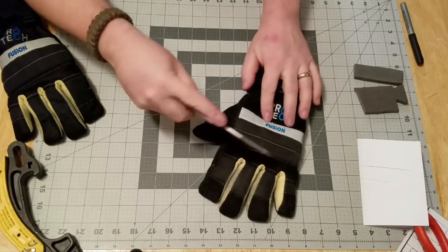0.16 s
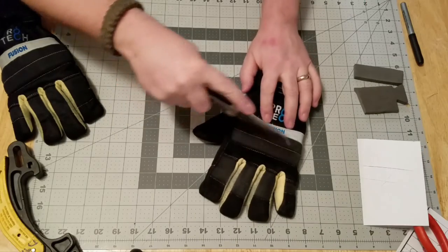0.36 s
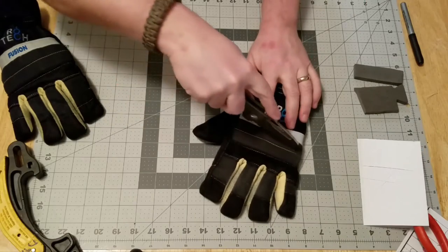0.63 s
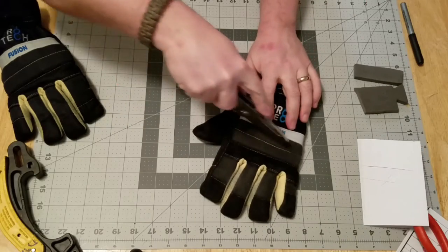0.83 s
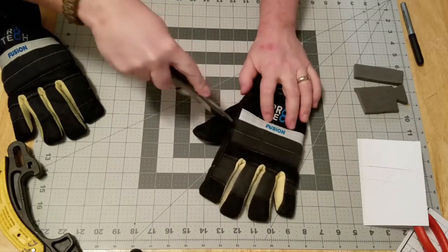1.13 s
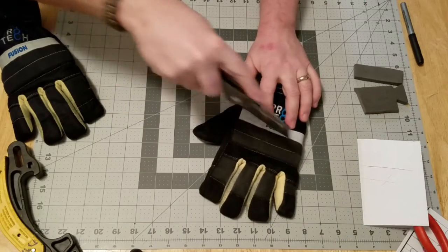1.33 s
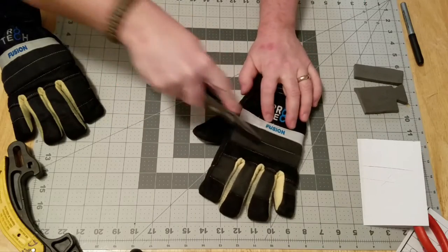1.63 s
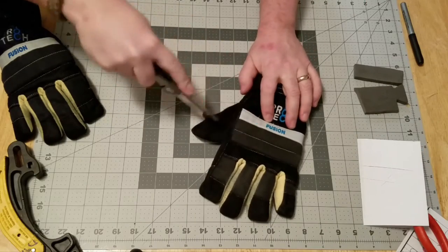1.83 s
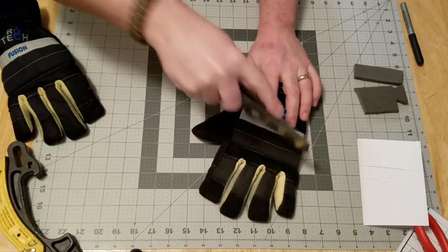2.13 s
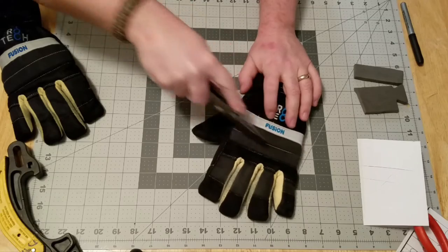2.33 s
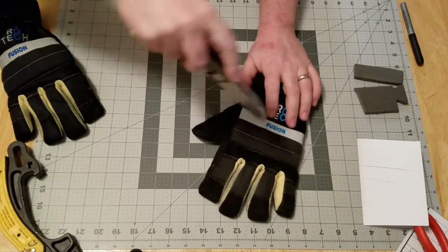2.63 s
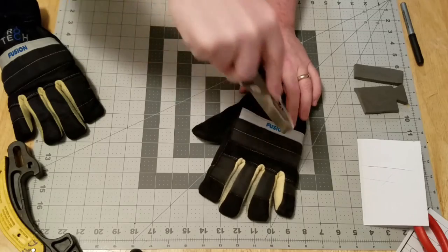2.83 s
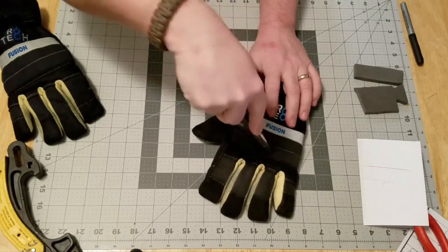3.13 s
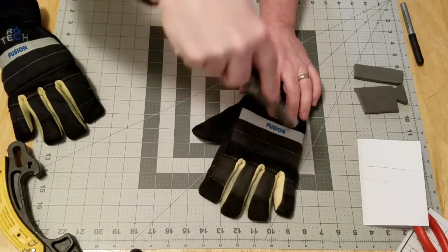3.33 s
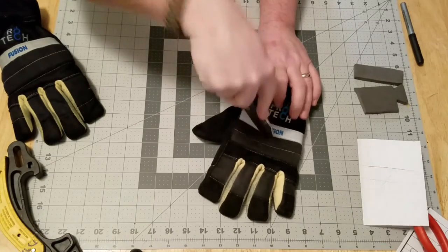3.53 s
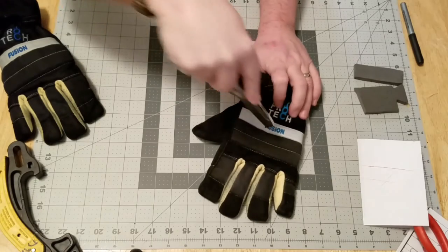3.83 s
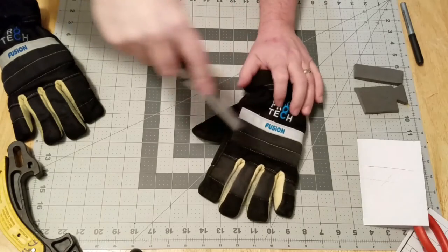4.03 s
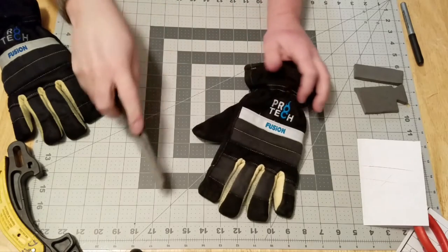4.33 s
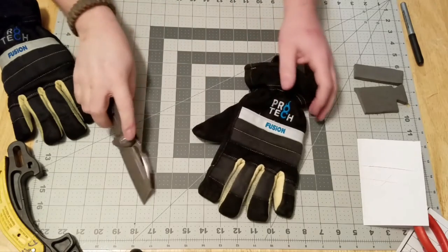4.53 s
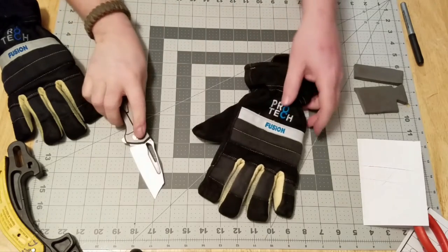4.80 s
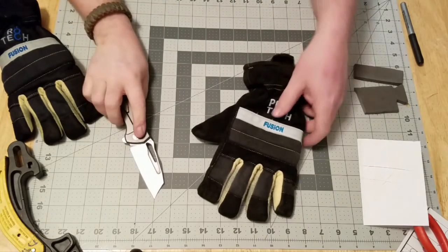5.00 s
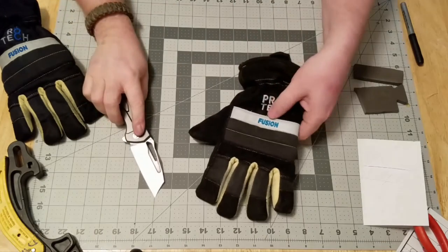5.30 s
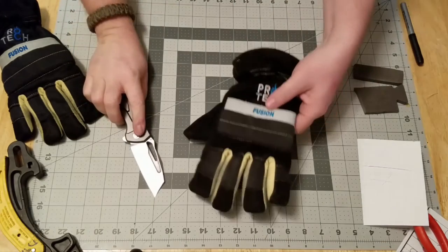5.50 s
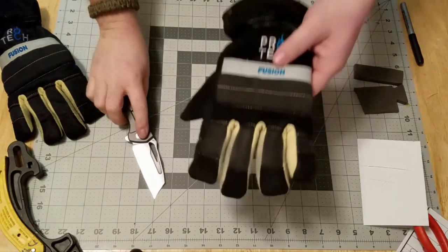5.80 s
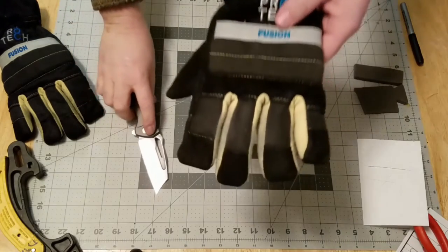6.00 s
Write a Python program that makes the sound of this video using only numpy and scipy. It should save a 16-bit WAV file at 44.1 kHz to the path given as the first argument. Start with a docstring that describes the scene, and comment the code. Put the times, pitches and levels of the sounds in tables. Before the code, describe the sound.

A knife rasps in three quick pulls across a padded glove, stabs it twice with crunching thumps, then clicks down on the mat.

```python
"""A folding knife cuts and stabs a padded glove on a cutting mat, close under two microphones in a small quiet room.
Three pulls rasp as the edge slips from thread to thread, each followed by a scuff off the glove's edge.
Two stabs crunch through the padding in jolts that ring the table; the knife clicks down on the mat.
The glove rustles as it is picked up. Behind it all a fan hums: coloured noise with wavering tones.
Rubbing is random grains given a spectrum; knocks and clicks are decaying modes, with echoes added."""
import sys
import numpy as np
from scipy import signal
from scipy.fft import rfft, irfft, next_fast_len
from scipy.io import wavfile

SR = 44100
rng = np.random.default_rng(int(sys.argv[2]) if len(sys.argv) > 2 else 0)


def materialize(psi):
    """Save the field psi as 16-bit PCM at rate SR to the path in sys.argv[1].

    A 1-D psi becomes a single channel; in a 2-D psi each row is a channel.
    """
    bounded = np.clip(np.atleast_2d(psi).T, -1, 1)
    quanta = np.round(bounded * 32767).astype(np.int16)
    wavfile.write(sys.argv[1], SR, quanta)


N = 271361
TIME = np.arange(N) / SR
RING_TIME = TIME[:SR // 2]


def from_db(db):
    """Decibels to gain."""
    return 10 ** (np.asarray(db) / 20)


def rms_one(x):
    """Scale to rms 1."""
    return x / np.sqrt(np.mean(x ** 2) + 1e-20)


def peak_one(x):
    """Scale to peak 1."""
    return x / np.abs(x).max()


def at_hz(points, hz):
    """Read a table on a log-frequency axis."""
    freq, value = np.transpose(points)
    return np.interp(np.log(np.maximum(hz, 1)), np.log(freq), value)


def add(track, s, sound):
    """Mix a short sound in at time s."""
    start = round(s * SR)
    track[start:start + len(sound)] += sound[:N - start]


def soften(x, hz):
    """Second-order low-pass."""
    return signal.sosfilt(signal.butter(2, min(hz, .45 * SR), fs=SR, output="sos"), x)


def thin(x, hz):
    """Second-order high-pass."""
    return signal.sosfilt(signal.butter(2, hz, "high", fs=SR, output="sos"), x)


def shaped(x, spectrum):
    """Give a steady excitation a spectrum; rms 1."""
    size = next_fast_len(N)
    gain = from_db(at_hz(spectrum, np.fft.rfftfreq(size, 1 / SR)))
    return rms_one(irfft(rfft(x, size) * gain, size)[..., :N])


def drift(rate):
    """Random wander through knots of rms 1, with rate knots per second joined by straight lines."""
    knots = rng.standard_normal(int(N / SR * rate) + 2)
    return np.interp(TIME * rate, np.arange(len(knots)), rms_one(knots))


def grains(per_s, spread_db):
    """Tiny slips at random moments, a few stronger than the rest; rms 1."""
    strength_db = spread_db * np.minimum(rng.exponential(1, N), 3)
    sizes = from_db(strength_db) * rng.choice([-1, 1], N)
    return rms_one(sizes * (rng.random(N) < per_s / SR))


def tick(decay_s, hz):
    """A very short burst of noise; peak 1."""
    burst = rng.standard_normal(len(RING_TIME)) * np.exp(-np.minimum(RING_TIME / decay_s, 40))
    return peak_one(signal.sosfilt(signal.butter(1, min(hz, .45 * SR), fs=SR, output="sos"), burst))


def ringing(modes):
    """The decaying modes (frequency [Hz], level [dB], t60 [s]) of a body after one tap."""
    return sum(from_db(db - 60 * RING_TIME / t60) * np.cos(2 * np.pi * hz * RING_TIME)
               for hz, db, t60 in modes)


def stroke(s, db, rise, decay, hold=0):
    """A stroke rises to its level, holds and dies away."""
    fade = np.exp(-np.clip((TIME - s - rise - hold) / decay, 0, 20))
    return from_db(db) * np.clip((TIME - s) / rise, 0, 1) * fade


def swell(s, rise, hold, release):
    """Pressure grows exponentially until time s, holds and lets go."""
    before = np.maximum(s - TIME, 0) / rise
    after = np.maximum(TIME - s - hold, 0) / release
    return np.exp(-np.minimum(before + after, 20))


def room_response(first_echo_s=0.0014):
    """Diffuse echoes as independent mid and side noise, each band dying at its own rate."""
    # reverberation of the small room: (frequency [Hz], t60 [s])
    room_t60 = [(125, 0.28), (500, 0.22), (2000, 0.23), (8000, 0.19), (16000, 0.11)]
    edges = np.geomspace(62.5, 16000, 9)
    white, out = rng.standard_normal((2, len(RING_TIME))), 0
    for low, high in zip(edges, edges[1:]):
        band = signal.sosfilt(signal.butter(2, [low, high], "band", fs=SR, output="sos"), white)
        t60 = at_hz(room_t60, np.sqrt(low * high))
        out = out + band * from_db(-60 * RING_TIME / t60)
    out = out * np.clip(RING_TIME / first_echo_s - 1, 0, 1)
    return out / np.sqrt((out ** 2).sum(axis=1, keepdims=True))


def in_room(x, room, wet_db, left_db, alike_hz):
    """Direct sound plus echoes; waves longer than the microphone spacing reach both alike."""
    left_lag_s = 1.4e-5  # the sound reaches the right microphone first
    mid, side = room[0], signal.sosfilt(signal.butter(1, alike_hz, "high", fs=SR, output="sos"), room[1])
    ears = np.array([mid + side, mid - side]) / np.sqrt(2)
    echoes = signal.fftconvolve(x[None], ears, axes=1)[:, :N]
    direct = np.array([np.interp(TIME - left_lag_s, TIME, x), x])
    wet = from_db(wet_db)
    balance = from_db([[left_db / 2], [-left_db / 2]])
    return (direct + wet * echoes) / np.sqrt(1 + wet ** 2) * balance


def fan(left_db=-2, waver_db=3.0, wander_rad=0.81, mains_wander_rad=.4):
    """Soft air noise, wide in the treble, with faint tones that waver and a motor drone."""
    # fan and room air: (frequency [Hz], relative level per Hz [dB])
    air_colour = [(20, -23), (40, -15), (60, -14), (85, -13), (130, 2.5), (190, -4.5), (350, -3),
                  (700, -8.5), (1100, -11.5), (2450, -15), (3200, -21), (6500, -30.5), (10000, -31),
                  (16000, -28)]
    # likeness of the air noise at the two microphones: (frequency [Hz], correlation [-1 to 1])
    air_likeness = [(60, 1), (200, 0.83), (500, 0.72), (1200, -0.015), (3000, -0.41), (8000, -0.029)]
    # steady tones of the fan, before they waver: (frequency [Hz], peak level [dB])
    hum_tones = [(129.2, -70), (240, -69.5), (360.7, -72.5), (479.1, -73.5), (2433, -75)]
    air_db = -60
    mains_hz, mains_db = 60.6, -74.5  # drone of the fan motor, rms level

    size = next_fast_len(N)
    alike = np.clip(at_hz(air_likeness, np.fft.rfftfreq(size, 1 / SR)), -.9, .99)
    mid, side = shaped(rng.standard_normal((2, N)), air_colour)
    side = irfft(rfft(side, size) * np.sqrt((1 - alike) / (1 + alike)), size)[:N]
    air = from_db(air_db) * np.array([mid + side, mid - side])
    hum = sum(from_db(db + waver_db * drift(8.7)) * np.sin(2 * np.pi * hz * TIME + wander_rad * drift(16))
              for hz, db in hum_tones)
    mains_phase = 2 * np.pi * mains_hz * TIME + mains_wander_rad * drift(9)
    mains = from_db(mains_db) * np.sqrt(2) * np.sin(mains_phase)
    return (air + hum + mains) * from_db([[left_db / 2], [-left_db / 2]])


def handling():
    """The padding rustles dully in the hand that gathers and lifts the glove."""
    # grips of the hand: (time [s], level [dB], rise [s], decay [s])
    grips = [(4.92, -51, 0.27, 0.44), (5.94, -54.5, 0.022, 0.35)]
    # rustle before it is dulled: (frequency [Hz], relative level per Hz [dB])
    rustle_colour = [(70, -16), (140, -16), (320, 3.5), (420, -2), (620, -5), (1200, -11.5), (2500, -18.5),
                     (5000, -12)]
    rustle = shaped(grains(per_s=7800, spread_db=5.0), rustle_colour)
    return sum(stroke(*row) for row in grips) * soften(rustle, hz=3000)


def swishes(decay_s=0.022):
    """Fine-grained rubbing of cloth."""
    # blade flicks off the glove's edge and brushes its thumb after each cut; last, fingers take the cuff:
    # (time [s], level [dB], rise [s])
    brushes = [(1.18, -40, 0.0009), (1.19, -40, .024), (1.863, -40.5, .003), (1.9355, -42.5, 0.0022),
               (2.571, -37, .002), (2.628, -43.5, .028), (4.987, -52.5, .005)]
    # cloth before the low cut: (frequency [Hz], relative level per Hz [dB])
    cloth_colour = [(60, -27), (100, -1), (150, 6.5), (330, -3), (535, 5.5), (705, -4), (1200, -3.5),
                    (1450, -7), (1910, -1.5), (2220, -6.5), (2990, -9.5), (3860, -15), (6290, -26.5),
                    (15000, -31.5)]
    envelope = np.sqrt(sum(stroke(s, db, rise, decay_s) ** 2 for s, db, rise in brushes))
    return envelope * thin(shaped(grains(per_s=5000, spread_db=3.5), cloth_colour), hz=148)


def slips(decay_s=0.023):
    """The flat of the blade hisses as it leaves the fibres."""
    # the blade slips lightly off the fabric: (time [s], level [dB], rise [s])
    slip_offs = [(1.19, -51.5, 0.015), (2.572, -48.5, .004), (3.217, -51.5, 0.026)]
    # hiss of the flat blade: (frequency [Hz], relative level per Hz [dB])
    slip_colour = [(410, -3), (700, 1.5), (777, -15), (1040, 3), (1520, -10), (1710, -35), (2160, 0),
                   (2800, -29), (3070, -8), (4610, -19), (9480, -13), (15200, -18), (16000, -30)]
    envelope = sum(stroke(s, db, rise, decay_s) for s, db, rise in slip_offs)
    return envelope * shaped(grains(per_s=4000, spread_db=5), slip_colour)


def table_knock(contact_hz, place, lowest_hz):
    """The place of a blow favours some modes; a padded contact leaves out the high ones."""
    # table top under the mat: (frequency [Hz], t60 [s], then relative level [dB] when struck at
    # place 0 (bare mat), 1 (middle of the glove), 2 (near its cuff))
    table_modes = [(97, 0.16, -24, -4.5, -11), (153.4, 0.11, 0.5, -4, -22), (212, 0.098, 1.5, -2, 1),
                   (324, 0.2, -12, 6.5, -2), (535, 0.056, -1, -2, -4), (607, 0.043, -5, -2.5, 3),
                   (819, 0.035, 1, 2, -19), (994, 0.14, -44, -2, -7), (1155, 0.15, -12, -19, -8.5),
                   (1536, 0.03, 12, -13, -15), (1765, 0.044, -18, -25, 1), (2240, 0.058, -4, 6, -2),
                   (2845, 0.032, -4, 4, -2)]
    modes = [(hz, np.interp(place, np.arange(len(levels)), levels), t60)
             for hz, t60, *levels in table_modes]
    knock = soften(ringing(modes), contact_hz)
    return peak_one(thin(knock, lowest_hz))


def landings(thud_delay_s=0.00217, scuff_db=-6):
    """The knife clicks and scuffs on the mat, then the weight of the hand thuds into the table."""
    # knife and knuckles land: (time [s], thud level [dB], metal click level [dB], click brightness [Hz])
    touchdowns = [(4.7713, -32.5, -34, 15000), (4.8625, -40, -45, 5000), (4.912, -37.5, -42, 5030)]
    # metal of the knife: (frequency [Hz], relative level [dB], t60 [s])
    knife_modes = [(675, 3, 0.054), (1490, -23, 0.038), (1650, -7, 0.054), (2010, -3, 0.055),
                   (2600, 5, 0.027), (3310, 2, 0.018), (3740, 1, 0.02), (4700, -20, .018), (9000, 7, 0.012),
                   (9500, -12, 0.008), (13000, 0, 0.0048)]
    out, thud = np.zeros(N), table_knock(contact_hz=378, place=0, lowest_hz=103)
    for s, thud_db, click_db, click_hz in touchdowns:
        ring = peak_one(soften(ringing(knife_modes), click_hz))
        scuff = soften(tick(decay_s=0.0097, hz=2350), click_hz)
        add(out, s, from_db(click_db) * (ring + from_db(scuff_db) * scuff))
        add(out, s + thud_delay_s, from_db(thud_db) * thud)
    return out


def presses(lowest_hz=90):
    """The blade meets the padding, which bottoms out on the table with a softer knock; one thread snaps."""
    # double knocks: (time [s], peak level [dB], second knock after [s], contact brightness [Hz])
    double_knocks = [(1.568, -47.5, 0.0097, 300), (1.825, -27, 0.01, 1320), (2.317, -35.5, 0.00518, 760)]
    place = 0.4  # between bare mat and middle of the glove
    second_db, second_hz = -4.5, 503  # second knock: level relative to the first, brightness
    thread_s, thread_db = 1.835, -35.5
    out = np.zeros(N)
    for s, db, gap, contact_hz in double_knocks:
        add(out, s, from_db(db) * table_knock(contact_hz, place, lowest_hz))
        add(out, s + gap, from_db(db + second_db) * table_knock(second_hz, place, lowest_hz))
    add(out, thread_s, from_db(thread_db) * tick(decay_s=0.0016, hz=12000))
    return out


def cuts(flutter_db=2, bite_hz=1500, skim_hz=750):
    """The edge skims, then bites thread by thread and shakes the stretched fabric; seams jerk it harder."""
    # three cuts, levels before flutter: (full pressure at [s], held for [s], swell [s], rasp level [dB],
    # skim leads by [s], skim level [dB], fibre hiss level [dB])
    pulls = [(1.055, 0.015, 0.024, -44, 0.041, -53.5, -61.5),
             (1.756, 0.074, 0.026, -44.5, 0.0054, -48, -56), (2.488, .016, 0.048, -50, 0.057, -53, -61)]
    # the edge catches on a seam and lets go: (time [s], peak level [dB], sharpness [Hz])
    catches = [(0.107, -43, 1200), (0.203, -47, 500), (1.0147, -37.5, 1500), (1.0545, -30.5, 2200),
               (1.0645, -30.5, 496), (1.089, -38, 900), (1.109, -39.5, 586), (1.742, -35, 870),
               (1.752, -35, 700), (2.496, -39, 700)]
    # stretched fabric before filtering: (frequency [Hz], relative level [dB], t60 [s])
    fabric_modes = [(341, -1, 0.064), (481, 3.5, 0.037), (550, 1, 0.033), (812, -1.5, 0.01),
                    (1013, -12.5, 0.046), (1340, -31, 0.011), (1620, -16, 0.012), (2230, -43, 0.0073),
                    (3160, -9.5, 0.0048)]
    # fibres parting under the edge: (frequency [Hz], relative level per Hz [dB])
    fibre_colour = [(1200, 4), (2500, -1), (4000, 4), (6500, -0.5), (8000, 3.5), (8900, 8), (10200, 1.5),
                    (13000, 3.5), (16000, -1)]
    release_s = .026
    skim_swell_s, skim_hold_s, skim_release_s = 0.062, 0.043, 0.095

    body, out = ringing(fabric_modes), np.zeros(N)
    body = thin(soften(body, hz=2600), hz=350)
    rasp = signal.fftconvolve(grains(per_s=1100, spread_db=3.5), soften(body, bite_hz))[:N]
    rasp = rms_one(rasp)
    skim = signal.fftconvolve(grains(per_s=1500, spread_db=4.5), body)[:N]
    skim = rms_one(thin(skim, skim_hz))
    hiss = shaped(grains(per_s=8300, spread_db=4), fibre_colour)
    for s, hold, rise, rasp_db, lead, skim_db, hiss_db in pulls:
        out += swell(s, rise, hold, release_s) * from_db(rasp_db) * rasp
        light_touch = from_db(skim_db) * skim + from_db(hiss_db) * hiss
        out += swell(s - lead, skim_swell_s, skim_hold_s, skim_release_s) * light_touch
    out *= from_db(flutter_db * drift(90))
    for s, db, sharpness_hz in catches:
        add(out, s, from_db(db) * peak_one(soften(body, sharpness_hz)))
    return out


def stabs(count=4, lowest_hz=73):
    """The point squeezes the padding, then crunches through in jolts that snap threads and knock the table."""
    # two stabs: (touches [s], pierces [s], first jolt's knock level [dB], between jolts [s],
    # change per jolt [dB], place [0-2], crunch level [dB], crunch held [s], first snap level [dB])
    thrusts = [(3.0468, 3.0550, -19, .0049, -3.3, 0.78, -35.5, 0.02, -31),
               (3.6259, 3.6401, -29, .0017, 1, 1.7, -36.5, 0.00755, -39)]
    # crunch of the padding before the low cut: (frequency [Hz], relative level per Hz [dB])
    crunch_colour = [(240, -5), (480, -6), (850, -2), (1330, -9.5), (1700, -7), (2300, -12.5), (3000, -18),
                     (3800, -22.5), (5000, -19), (6400, -27.5), (9000, -18.5), (11500, -28), (15000, -24),
                     (16000, -23)]
    touch_db, touch_hz, jolt_hz = -31, 690, 1820  # soft first touch; brightness of the hard jolts
    rise_s, decay_s, squeeze_db = 0.0013, 0.0077, -47.5  # padding squeezed between touch and piercing
    jitter = .15  # greatest shift of a jolt, as a share of the time between jolts
    # weight of the hand after each stab: level relative to the first jolt's knock, brightness, place
    hand_db, hand_hz, hand_place = -11.5, 218, .4

    out = np.zeros(N)
    fibres = thin(shaped(grains(per_s=12000, spread_db=3.0), crunch_colour), hz=70)
    for touch, pierce, db, gap, step_db, place, crunch_db, hold, snap_db in thrusts:
        add(out, touch, from_db(touch_db) * table_knock(touch_hz, place, lowest_hz))
        out += fibres * stroke(touch, squeeze_db, rise_s, decay_s, pierce - touch)
        out += fibres * stroke(pierce - rise_s, crunch_db, rise_s, decay_s, hold)
        add(out, pierce + hold, from_db(db + hand_db) * table_knock(hand_hz, hand_place, lowest_hz))
        for k, shift in enumerate(rng.uniform(-1, 1, count)):
            knock = from_db(db) * table_knock(jolt_hz, place, lowest_hz)
            snap = from_db(snap_db) * tick(decay_s=0.0012, hz=16000)
            add(out, pierce + (k + jitter * shift) * gap, from_db(k * step_db) * (knock + snap))
    return out


def scene():
    """The glove lies close under the microphones; its knocks come mostly direct, swishes with most echo."""
    room = room_response()
    return (fan()
            + in_room(slips() + handling(), room, wet_db=-8, left_db=-3.0, alike_hz=895)
            + in_room(swishes(), room, wet_db=0, left_db=-1.6, alike_hz=600)
            + in_room(landings(), room, wet_db=-2.5, left_db=-2.0, alike_hz=600)
            + in_room(cuts(), room, wet_db=-3.0, left_db=-1.5, alike_hz=700)
            + in_room(stabs() + presses(), room, wet_db=-8.0, left_db=-2.5, alike_hz=403))


def record(dry):
    """The top is cut steeply above 15.9 kHz."""
    return signal.sosfilt(signal.ellip(12, .1, 70, 15900, fs=SR, output="sos"), dry)


dry = scene()
out = record(dry)
materialize(out)
```